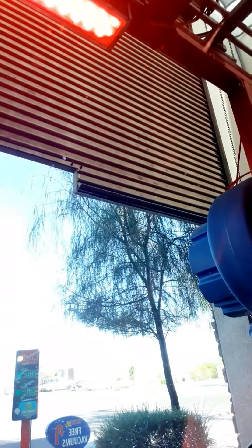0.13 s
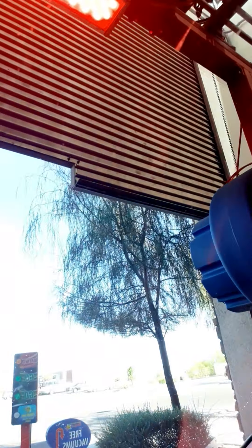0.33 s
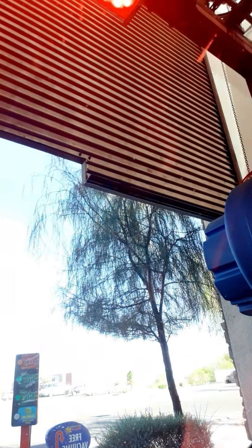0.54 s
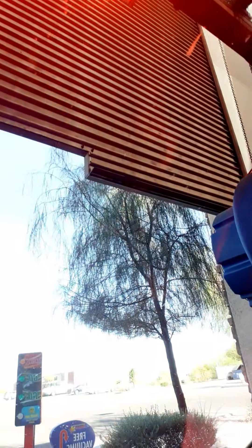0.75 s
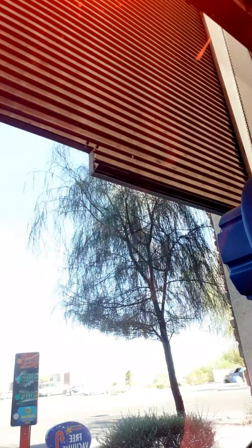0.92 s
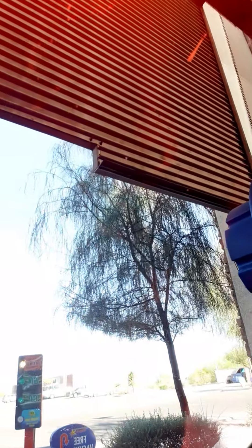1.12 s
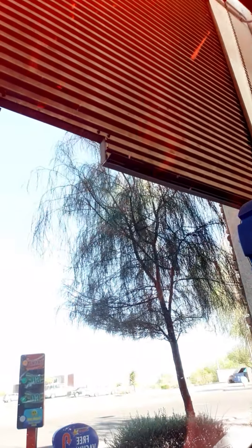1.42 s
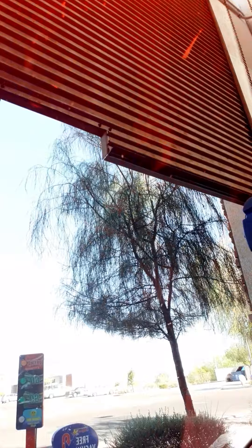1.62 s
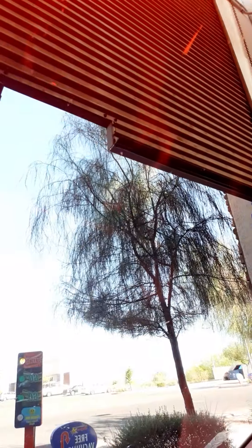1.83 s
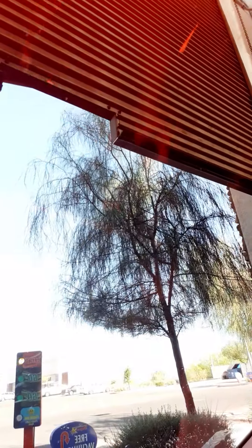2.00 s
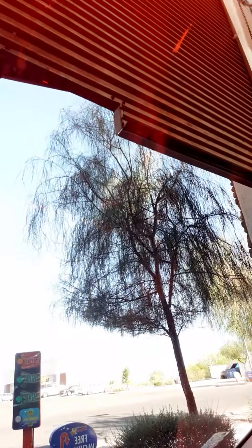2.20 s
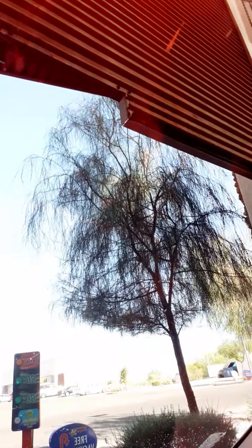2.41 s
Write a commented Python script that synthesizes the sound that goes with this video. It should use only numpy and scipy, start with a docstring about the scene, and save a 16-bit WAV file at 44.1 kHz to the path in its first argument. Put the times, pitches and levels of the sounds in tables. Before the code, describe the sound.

Large drying blowers in a car wash roar throughout, about 2.5 seconds, heard inside a closed car. The sound is deep and muffled, with gusty buffeting and cabin boom, strongest around 0.5 to 0.8 seconds. Soft hiss grows duller as the car rolls away. A faint wavering mid-pitched whine surfaces, most near 1.7 seconds. Tiny dry plastic ticks come at 0.1 and 0.8 seconds.

```python
"""Big drying blowers of a car wash tunnel, heard inside the closed car as it rolls out from under them.
The jets buffet roof and glass and make the cabin boom at its resonances; their hiss leaks in, duller as the
car moves away. Both are noise, coloured and split into bands whose levels follow curves in time.
The impellers whine faintly at blade rate: two wavering sine tones.
Something plastic ticks twice in the cabin: short noise tails ringing in resonators, each led by a sharp crack."""
import sys
import numpy as np
from scipy import signal
from scipy.fft import rfft, irfft, next_fast_len
from scipy.io import wavfile
from scipy.ndimage import uniform_filter1d

SR = 44100
rng = np.random.default_rng(int(sys.argv[2]) if len(sys.argv) > 2 else 0)


def attenuation_scalar(level_db):
    """Turn a level in dB into a linear amplitude multiplier (20 dB per decade)."""
    decades = np.asarray(level_db, float) / 20
    return 10 ** decades


def log_audio(samples):
    """Write samples as a 16-bit WAV file to the path given in sys.argv[1]."""
    # one column per channel
    frames = np.atleast_2d(samples).T
    # limit to full scale, then quantise
    limited = np.clip(frames, -1, 1)
    pcm = np.round(limited * 32767).astype(np.int16)
    wavfile.write(sys.argv[1], SR, pcm)


N = 112454   # length in samples, about 2.55 s


def rms_one(x):
    """Scale a sound so that its rms is 1."""
    return x / np.sqrt(np.mean(x ** 2) + 1e-20)


def at_hz(points, hz):
    """Read a two-column table between its rows, along a log-frequency axis."""
    table_hz, value = np.transpose(points)
    return np.interp(np.log(hz), np.log(table_hz), value)


def in_time(rows):
    """Read each column of a curve at every sample; the first column is the time in seconds."""
    seconds, *columns = np.transpose(rows)
    return [np.interp(np.arange(N) / SR, seconds, column) for column in columns]


def bump(hz, centre_hz, width_hz):
    """Shape of a resonance: 1 on top, half at half the width to either side."""
    return 1 / (1 + (2 * (hz - centre_hz) / width_hz) ** 2)


def drift(rate_hz):
    """Random wandering of spread 1: noise smoothed twice, so that it moves slower than about rate_hz."""
    hop = 40   # samples from one drawn point to the next
    r = np.exp(-2 * np.pi * rate_hz * hop / SR)
    points = rng.standard_normal(N // hop + 2002)
    slow = signal.lfilter([1], [1, -2 * r, r * r], points)[2000:]   # skip the filter's start
    slow = rms_one(slow - slow.mean())
    return np.interp(np.arange(N) / hop, np.arange(len(slow)), slow)


# How alike the noise is at the two microphones. Each row: frequency in Hz, shared part of the power (0 to 1).
ALIKE = [(40, .995), (180, .97), (260, .75), (400, .72), (560, .35), (720, .4), (900, .25), (1700, .3),
         (3000, .1), (15000, .02)]
# How late the shared noise reaches the right microphone. Each row: frequency in Hz, delay in ms.
RIGHT_DELAY = [(60, .1), (300, 0.09), (450, 0.081), (600, 0.36), (720, 0.24), (1000, 0.4), (15000, 0.55)]


def noise_pair(hz, size):
    """Noise spectra at two microphones: a shared part, late on the right, and a part of each one's own."""
    shared, left, right = rfft(rng.standard_normal((3, size)))
    alike = np.clip(at_hz(ALIKE, hz), 0, 1)
    delay_s = at_hz(RIGHT_DELAY, hz) / 1000
    late = np.exp(-2j * np.pi * hz * delay_s)
    together = shared * np.array([np.ones_like(late), late])
    return np.sqrt(alike) * together + np.sqrt(1 - alike) * np.array([left, right])


# Colour of the air noise through body and glass. Each row: frequency in Hz, relative level in dB per Hz.
AIR_COLOUR = [(24, -41), (40, -8.5), (166, -1.5), (224, -8.5), (273, -8.5), (317, -13.5), (360, -12.5),
              (450, -16.5), (607, -23.5), (706, -23), (840, -29), (1130, -31), (1320, -36), (1910, -41),
              (7560, -59.5), (9000, -60.5), (15600, -68)]
# Resonances of cabin and panels, and the hollows between them.
# Each row: centre in Hz, width in Hz, lift in dB (below zero for a hollow).
CABIN_RESONANCES = [(57, 12, 5), (80, 16, 4), (101, 10, -4), (127, 16, 6), (147, 8, -4), (160, 14, 4),
                    (188, 14, 2), (262, 30, 2), (350, 50, 2)]
# How much louder the left side is. Each row: frequency in Hz, left over right in dB.
LEFT_LEAN = [(40, 1.5), (80, -0.5), (125, 4.5), (170, -1.5), (220, 4), (280, 1.5), (380, 5.5), (480, 1.5),
             (650, 6), (830, 1), (1000, 4), (1300, 0.5), (1600, 3), (2400, 0.5), (4400, 1), (15000, 2)]
# The boom comes in gusts; only the swing around each column's average is used.
# Each row: time in seconds, then levels in dB of the low rumble, the lower and the upper cabin boom.
BOOM_GUSTS = [(0, -17.5, -19, -16), (.15, -21, -19, -15.5), (.3, -26, -17.5, -19.5), (.42, -19, -17, -19.5),
              (.52, -15.5, -13.5, -13), (.65, -20, -15.5, -17), (.8, -24, -11, -12),
              (.9, -23, -21.5, -17.5), (1.05, -20.5, -19.5, -17.5), (1.2, -14, -21, -21),
              (1.33, -20.5, -17, -14), (1.5, -18, -20.5, -12), (1.62, -20, -19, -21.5),
              (1.75, -19, -18.5, -14), (1.9, -18.5, -24.5, -23), (2.05, -19, -19, -16),
              (2.2, -22, -22.5, -17), (2.38, -18.5, -13.5, -17), (2.55, -14, -24.5, -20)]
# The car draws away from the jets; again only the swing around the average is used.
# Each row: time in seconds, then levels in dB of the roar, the rush, the hiss and the top hiss.
DRAWING_AWAY = [(0, -23, -37.5, -49, -62), (.5, -21, -37.5, -50, -65), (.95, -22.5, -40, -51.5, -65.5),
                (1.3, -20.5, -40.5, -52.5, -65.5), (1.9, -23.5, -41, -53.5, -67.5),
                (2.55, -22.5, -41, -55.5, -69)]
# Where each of those seven levels rules, from low rumble to top hiss: one frequency in Hz for each.
LEVEL_HZ = [65, 127, 170, 350, 1400, 5500, 13000]


def rush():
    """Jet noise coloured by body and cabin, in overlapping third-octave bands that each swell and flicker."""
    rush_db = -12   # rms of the whole rush
    gust_db, gust_hz = 0.3, 4   # swing shared by all bands
    flutter_db, flutter_hz = 0.74, 13   # each band's own fast flicker
    # The jets' turbulence shakes all the treble together.
    shake_db, shake_hz, treble_from_hz = 0.16, 15, 1100
    # Below this frequency, bands are evened out so that their loudness follows the gusts.
    steady_below_hz, steady_samples = 220, int(0.15 * SR)

    size = next_fast_len(N)
    hz = np.maximum(np.arange(size // 2 + 1) * SR / size, 1)
    colour_db = at_hz(AIR_COLOUR, hz)
    for centre_hz, width_hz, lift_db in CABIN_RESONANCES:
        colour_db = colour_db + lift_db * bump(hz, centre_hz, width_hz)
    side_db = at_hz(LEFT_LEAN, hz) / 2 * np.array([[1], [-1]])
    noise = noise_pair(hz, size) * attenuation_scalar(colour_db + side_db)

    swings = [level - level.mean() for level in in_time(BOOM_GUSTS) + in_time(DRAWING_AWAY)]
    gust = drift(gust_hz)
    shake = drift(shake_hz)
    out = 0
    for k in range(27):
        band_hz = 40 * 2 ** (k / 3)
        # Neighbouring bands cross-fade; the lowest one keeps everything beneath it.
        place = np.clip(3 * np.log2(hz / band_hz), -1 if k else 0, 1)
        band = irfft(noise * np.cos(np.pi / 2 * place) ** 2, size)[:, :N]
        if band_hz < steady_below_hz:
            power = (band ** 2).mean(axis=0)
            smooth = uniform_filter1d(uniform_filter1d(power, steady_samples), steady_samples)
            band = band * np.sqrt(power.mean() / smooth)
        # Blend the two level curves whose frequencies lie around this band.
        shares = [np.interp(np.log(band_hz), np.log(LEVEL_HZ), row) for row in np.eye(len(swings))]
        treble_share = 1 / (1 + (treble_from_hz / band_hz) ** 2)
        level_db = np.dot(shares, swings) + gust_db * gust + flutter_db * drift(flutter_hz)
        out = out + band * attenuation_scalar(level_db + shake_db * shake * treble_share)
    return attenuation_scalar(rush_db) * rms_one(out)


# Blade tone and overtone. Each row: frequency in Hz, spread of its waver in Hz,
# then left and right level in dB, counted from the whine's level curve.
BLADE_TONES = [(712, 4, 1, -5), (1428, 22, -16, -18)]
# The whine swells and sinks. Each row: time in seconds, level in dB.
WHINE_CURVE = [(0, -52), (.5, -41), (.8, -44.5), (1.2, -39.5), (1.5, -46.5), (1.7, -35.5), (1.82, -44),
               (2.55, -45)]


def whine():
    """Sine tones at blade rate waver in pitch and strength as the air load on the impellers shifts."""
    out = 0
    for tone_hz, waver_hz, left_db, right_db in BLADE_TONES:
        pitch_hz = tone_hz + waver_hz * drift(12)
        strength = attenuation_scalar(1.5 * drift(10))
        tone = np.sin(2 * np.pi * np.cumsum(pitch_hz) / SR) * strength
        out = out + rms_one(tone) * attenuation_scalar(np.array([[left_db], [right_db]]))
    return out * attenuation_scalar(in_time(WHINE_CURVE)[0])


# The two plastic ticks. Each row: start in seconds, level in dB (before filtering).
TICK_TIMES = [(.1043, -30), (.8317, -29.5)]
# Resonances of the ticking plastic. Each row: centre in Hz, width in Hz, left and right strength in dB.
PLASTIC_RESONANCES = [(3660, 750, -1, 1), (4050, 1100, 1, 1), (8600, 1200, -1, -10)]


def ticks():
    """A dry crack at the left microphone; its short scatter off glass and trim rings in the plastic."""
    rise_s, t60_s = 0.0012, 0.045   # the scatter's rise, and its time to fall by 60 dB
    crack_db, tail_db = 8, -2.5   # counted from the tick's level
    low_cut_hz, treble_fall_hz = 2500, 8000
    out = np.zeros((2, N + SR))
    t = np.arange(SR // 8) / SR
    soften = signal.butter(1, treble_fall_hz, fs=SR, output="sos")
    thin = signal.butter(2, low_cut_hz, "high", fs=SR, output="sos")
    # Eight samples of a tone at a quarter of the sample rate.
    crack = np.hanning(8) * np.cos(np.arange(8) * np.pi / 2)
    for start_s, level_db in TICK_TIMES:
        envelope = attenuation_scalar(tail_db - 60 * t / t60_s) * (1 - np.exp(-t / rise_s))
        tail = rng.standard_normal((2, len(t))) * envelope
        body = tail.copy()
        for centre_hz, width_hz, left_db, right_db in PLASTIC_RESONANCES:
            r = np.exp(-np.pi * width_hz / SR)
            poles = [1, -2 * r * np.cos(2 * np.pi * centre_hz / SR), r * r]
            rung = signal.lfilter([1 - r * r, 0, r * r - 1], poles, tail)
            body += rung * attenuation_scalar(np.array([[left_db], [right_db]]))
        body = signal.sosfilt(soften, body)
        body[0, :8] += attenuation_scalar(crack_db) * crack
        start = int(start_s * SR)
        out[:, start:start + len(t)] += attenuation_scalar(level_db) * body
    return signal.sosfilt(thin, out[:, :N] + 1e-18)


def scene():
    """All that reaches the two microphones."""
    return rush() + whine() + ticks()


def band_limit(x):
    """A steep low-pass at the top of the band."""
    return signal.sosfilt(signal.butter(12, 15730, fs=SR, output="sos"), x)


# Port resonances of the microphones. Each row: centre in Hz, width in Hz, left and right lift in dB.
PORT_RESONANCES = [(4100, 410, 0.5, 3.5), (7640, 800, -5.5, -1.5), (8840, 1400, 5.5, 1.5)]


def record(dry):
    """The loudest peaks are rounded, port resonances colour the treble and the deep bass is cut."""
    top, low_cut_hz = 2.5, 56.5   # peak ceiling as amplitude; bass cut falls 18 dB per octave
    pad = 4096   # mirrored, faded samples at each end keep the filter from wrapping around
    rounded = top * np.tanh(dry / top)
    padded = np.pad(rounded, ((0, 0), (pad, pad)), "reflect", reflect_type="odd")
    size = padded.shape[1]
    hz = np.arange(size // 2 + 1) * SR / size
    colour_db = 0
    for centre_hz, width_hz, left_db, right_db in PORT_RESONANCES:
        colour_db = colour_db + bump(hz, centre_hz, width_hz) * np.array([[left_db], [right_db]])
    bass_cut = 1 / np.sqrt(1 + (low_cut_hz / np.maximum(hz, 1)) ** 6)
    fade = np.clip(np.minimum(np.arange(size), size - np.arange(size)) / pad, 0, 1)
    mix = irfft(rfft(padded * fade) * attenuation_scalar(colour_db) * bass_cut, size)[:, pad:-pad]
    return band_limit(mix)


dry = scene()
out = record(dry)
log_audio(out)
```